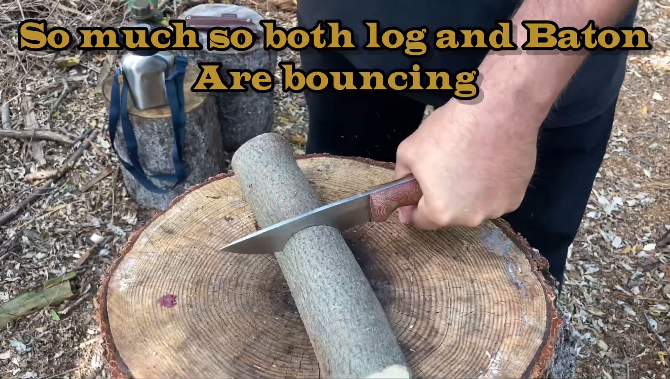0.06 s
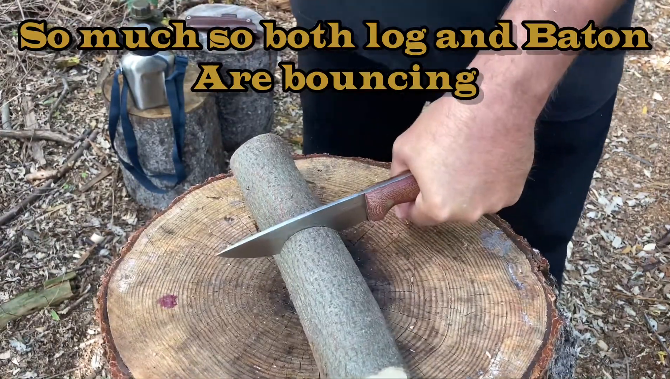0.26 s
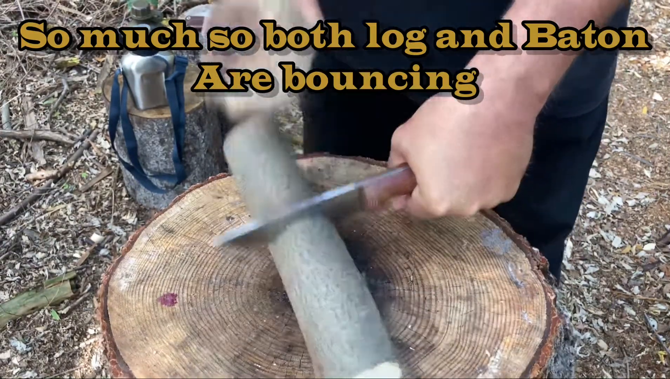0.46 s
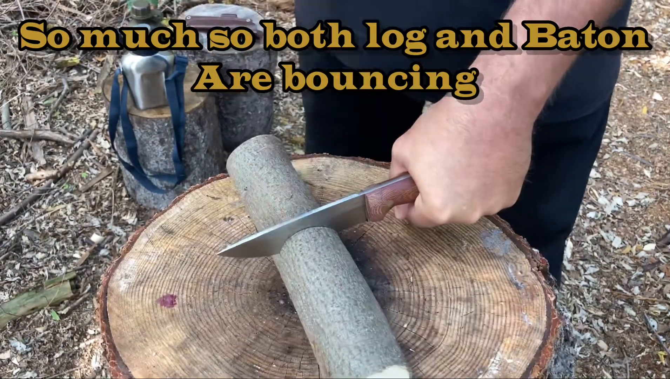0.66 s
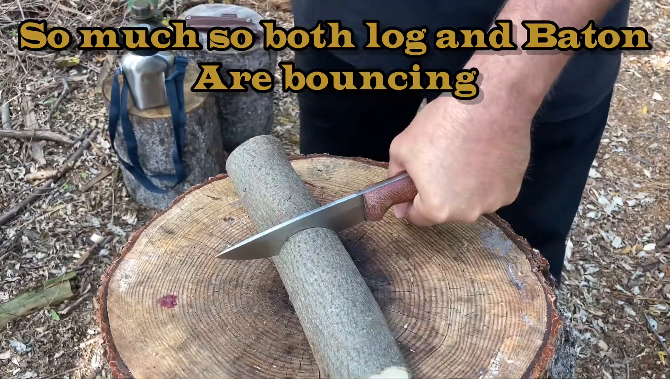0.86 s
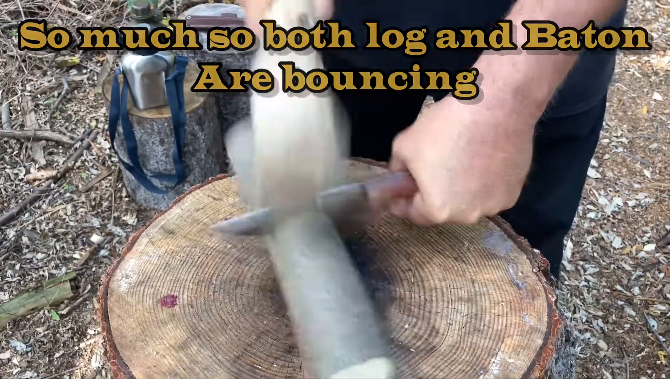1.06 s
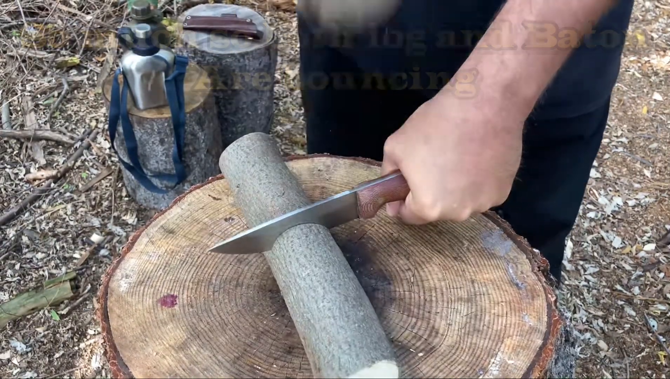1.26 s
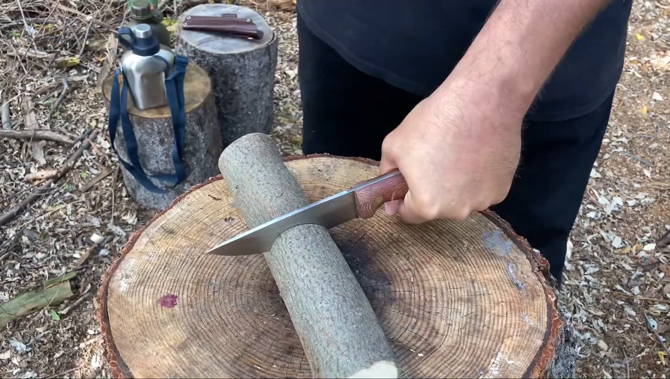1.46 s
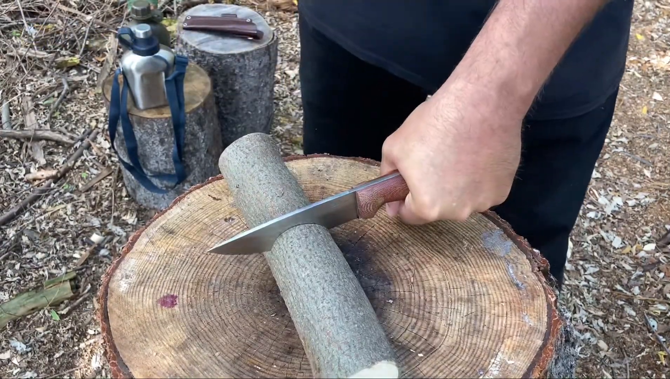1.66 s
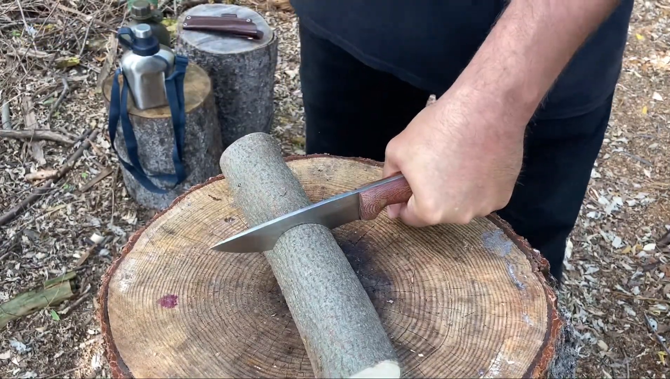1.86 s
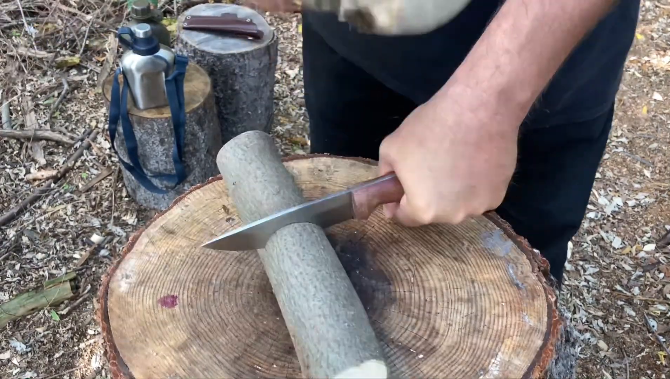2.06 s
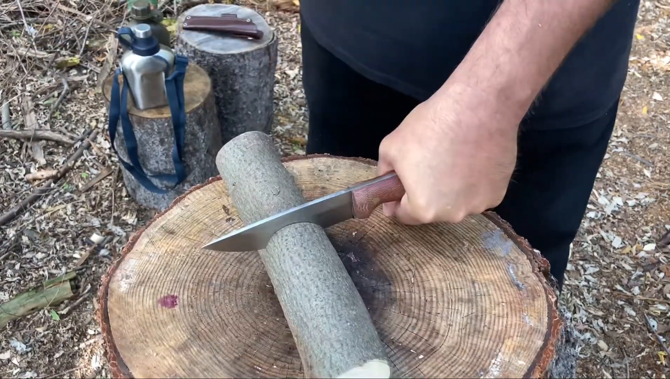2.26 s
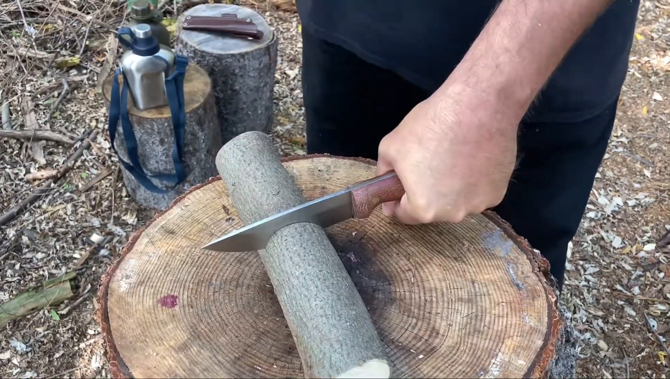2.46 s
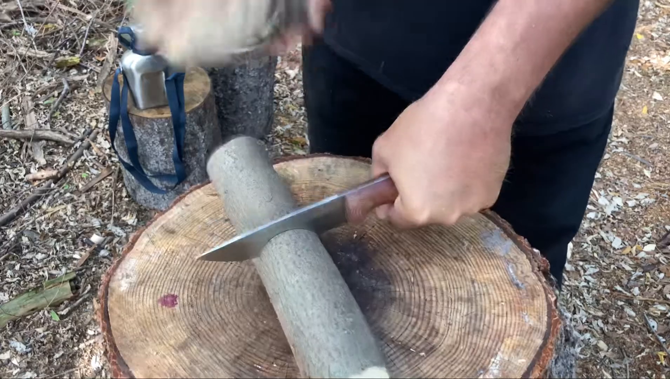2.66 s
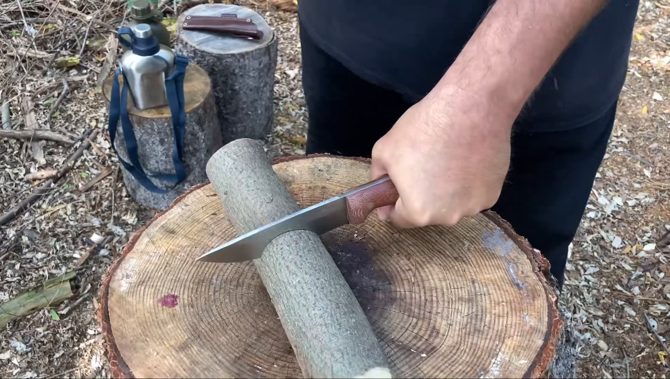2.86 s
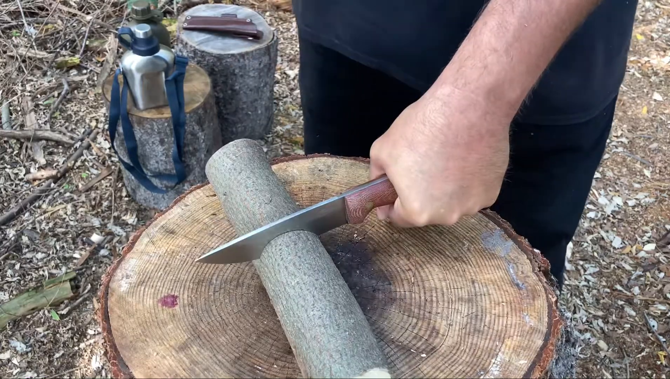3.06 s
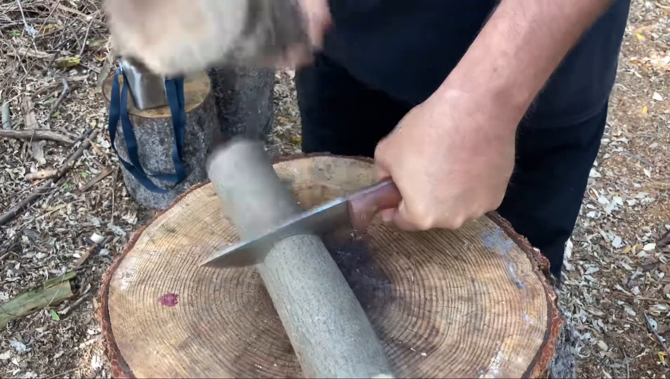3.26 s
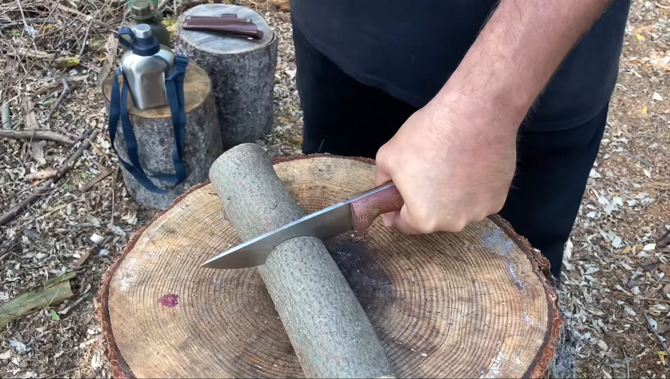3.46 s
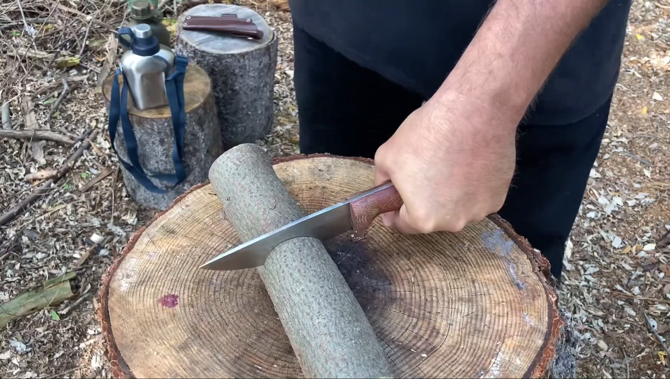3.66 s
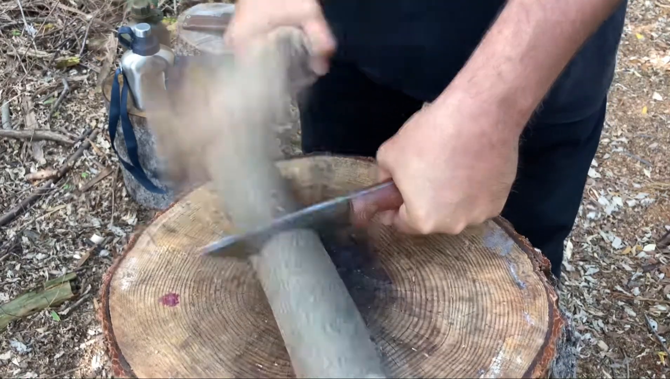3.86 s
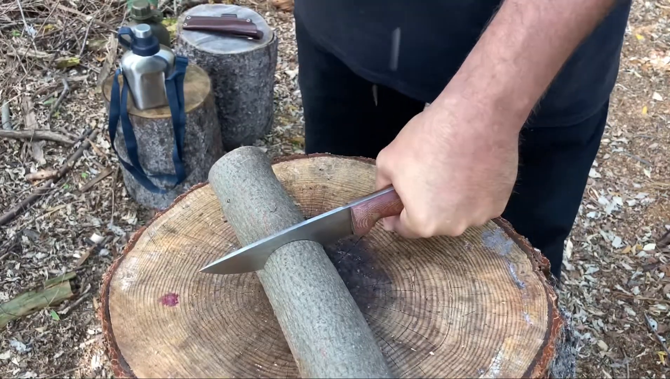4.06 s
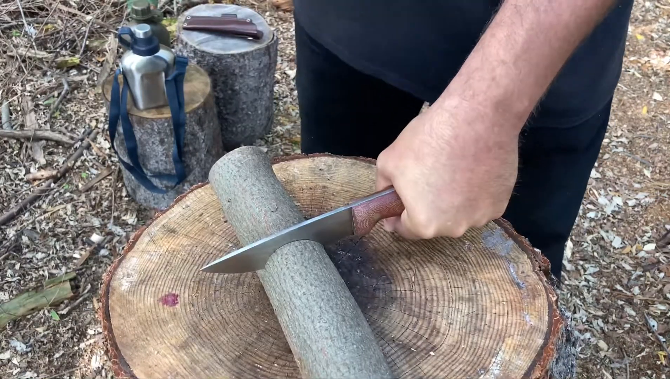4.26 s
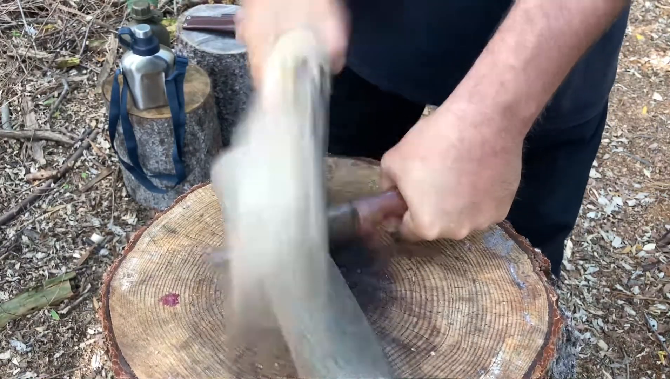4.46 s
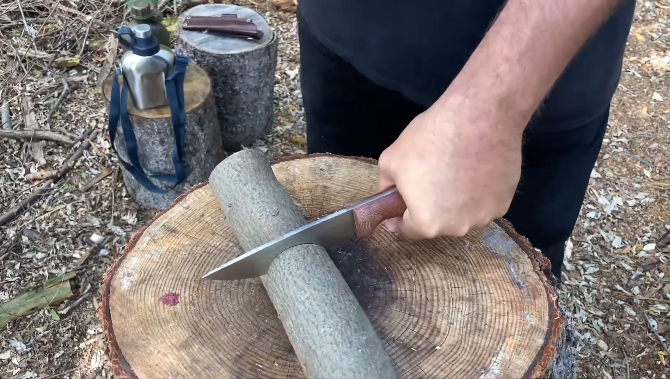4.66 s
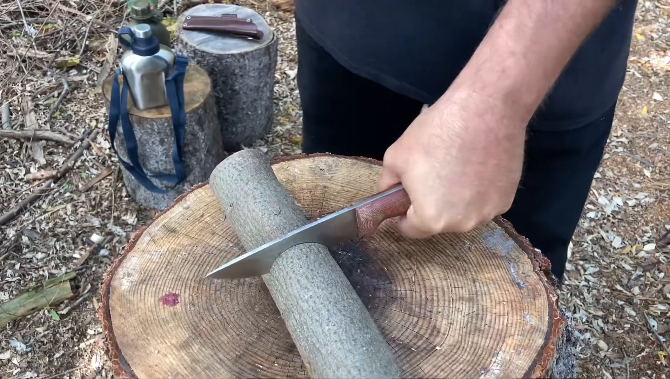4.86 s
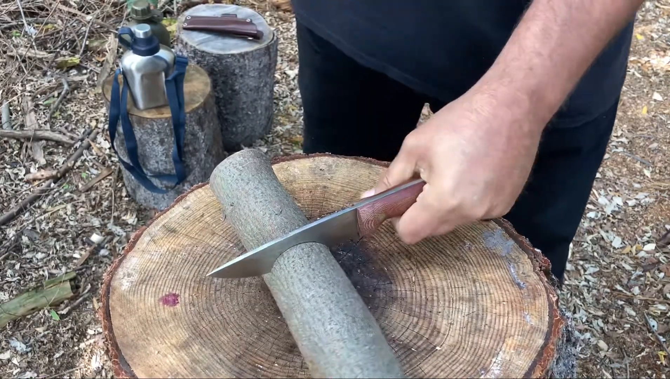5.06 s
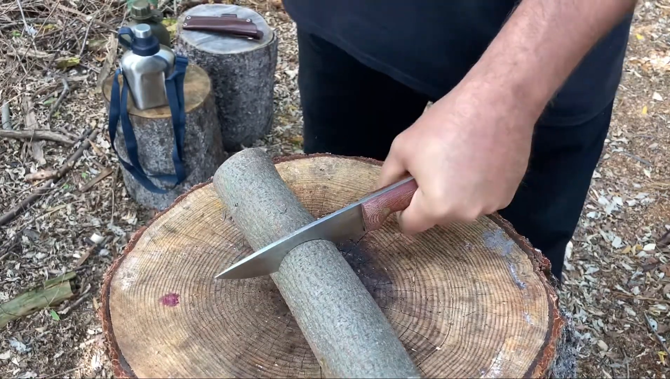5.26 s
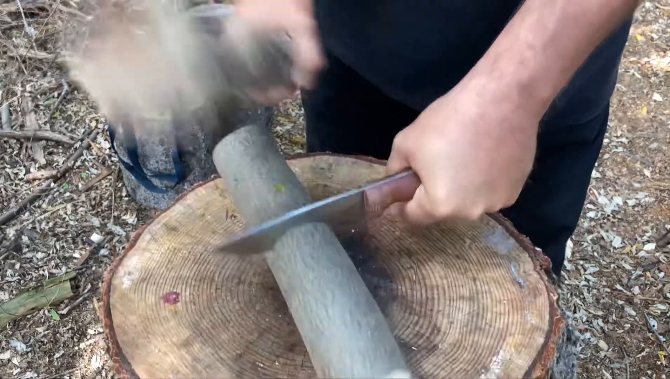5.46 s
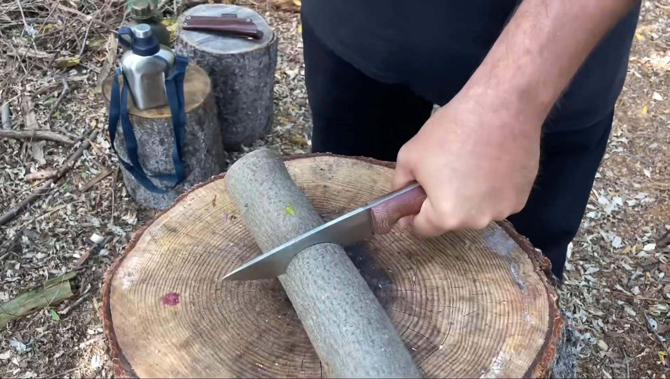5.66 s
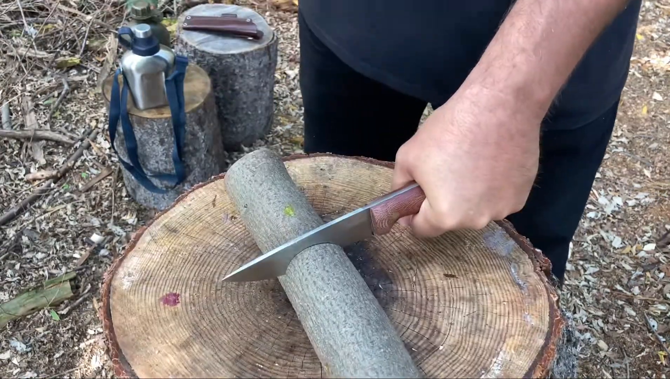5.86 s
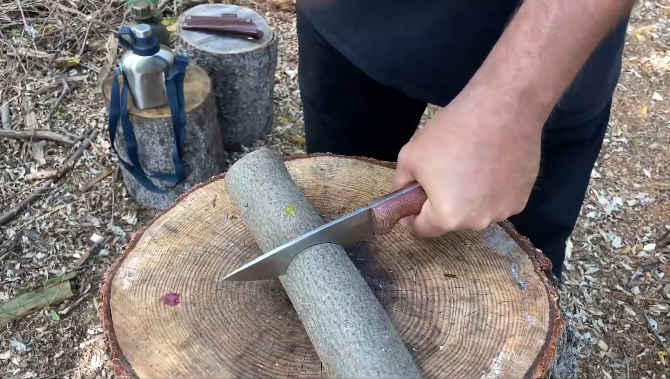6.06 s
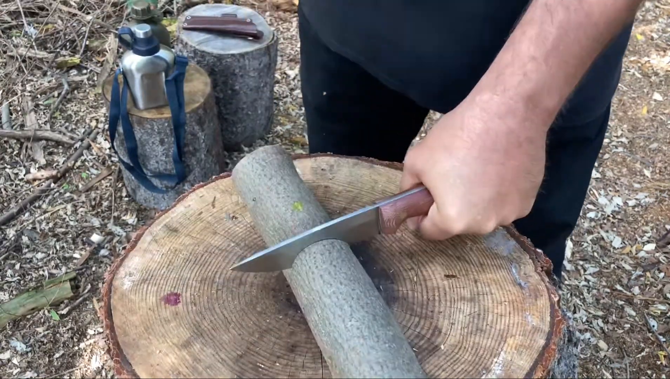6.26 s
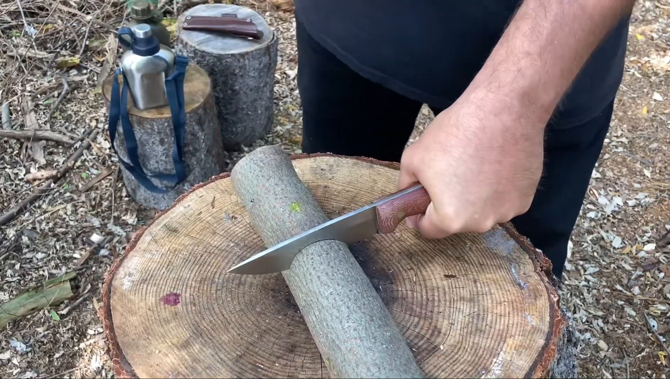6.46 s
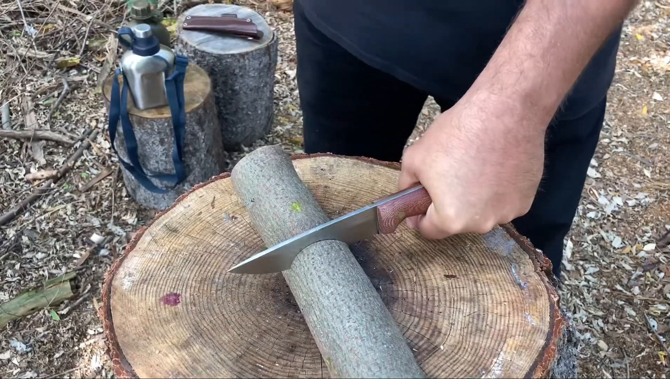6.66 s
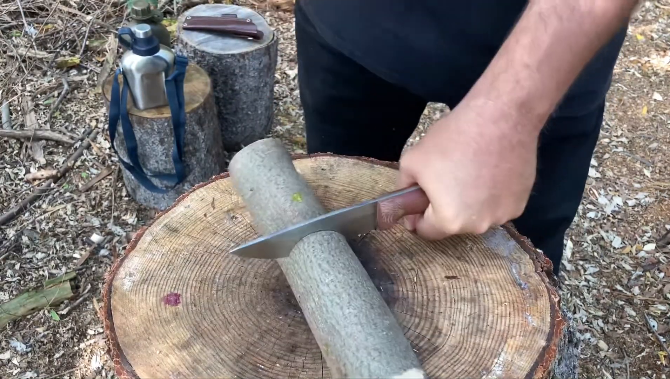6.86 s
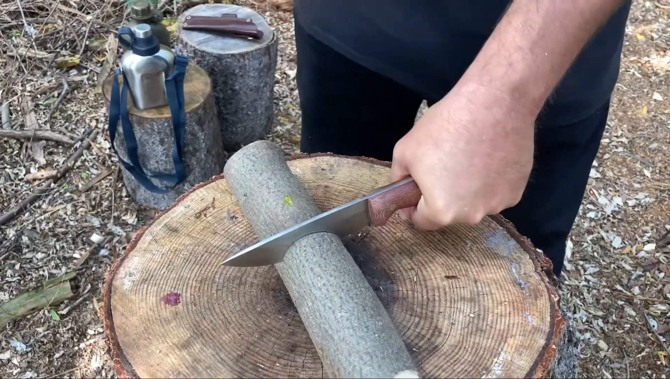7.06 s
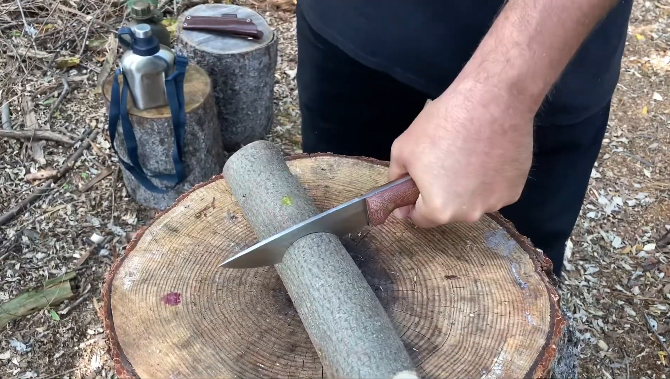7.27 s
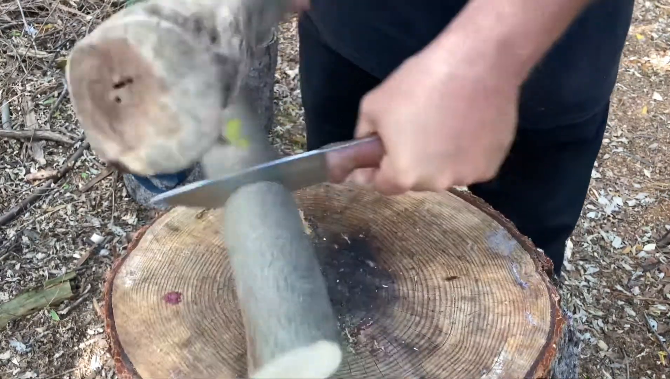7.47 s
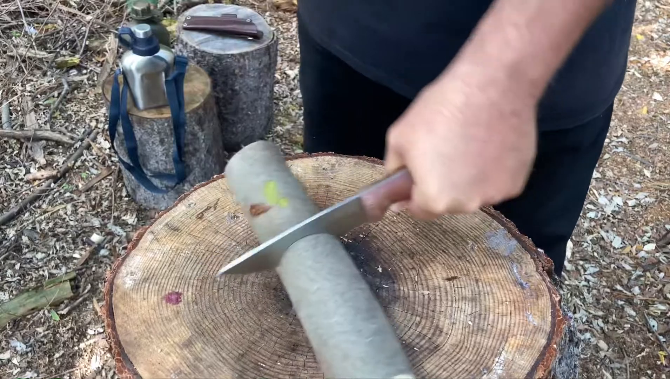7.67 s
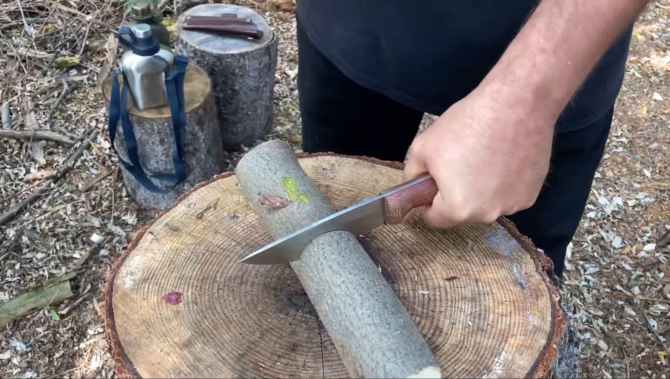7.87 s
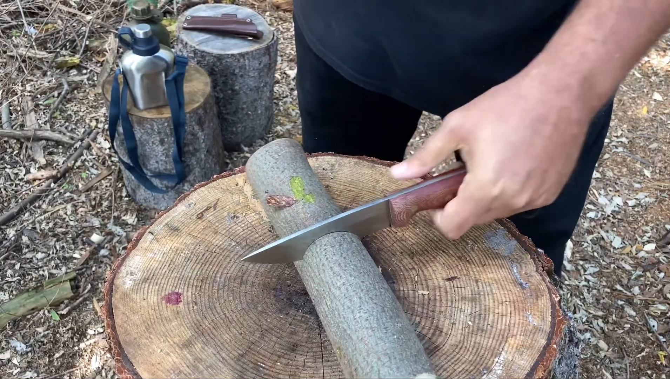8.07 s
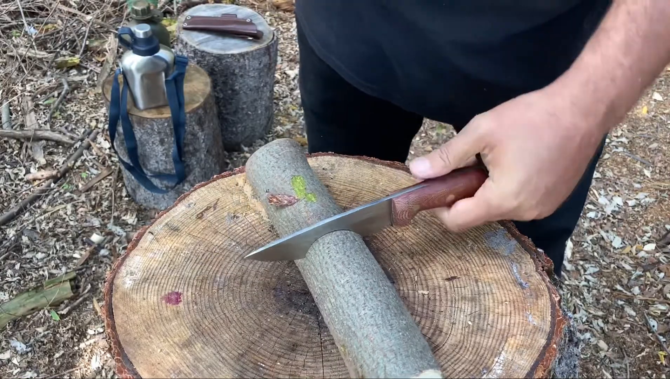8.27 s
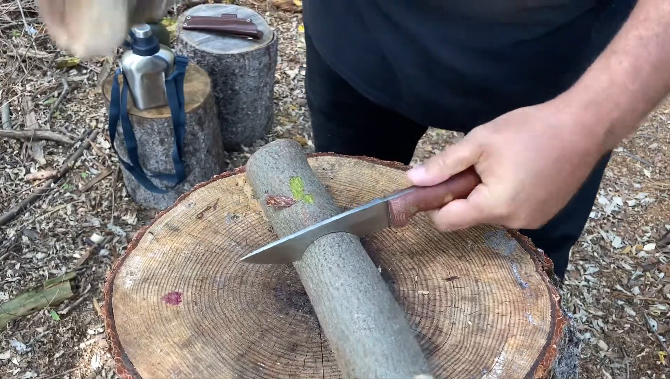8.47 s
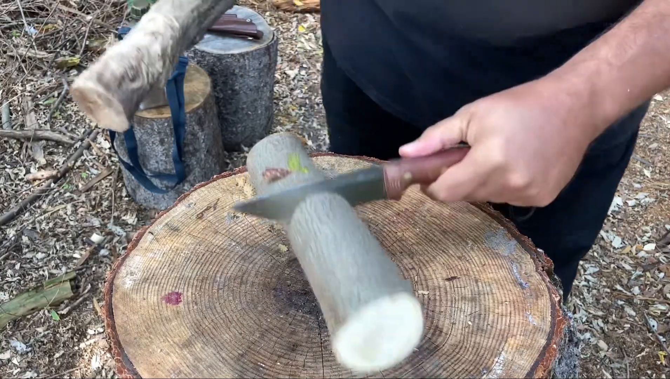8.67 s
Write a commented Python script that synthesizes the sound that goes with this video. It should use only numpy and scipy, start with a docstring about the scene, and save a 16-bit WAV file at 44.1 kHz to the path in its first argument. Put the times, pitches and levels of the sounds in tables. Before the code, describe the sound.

A wooden baton knocks a knife into a log eleven times at a steady pace, with sharp, close whacks in quiet woods.

```python
"""Batoning a log in a wood

A wooden baton drives a knife into a log on a stump. Each impact excites the damped modes of baton,
blade, log, stump and ground; the log bounces to rest and the trees scatter back a soft tail. The close
microphone overloads on the blows. At the end the log is set down and rocks once. Behind it all are
a low rumble, a soft hush, shrilling insects, faint bird whistles and two distant motors."""
import sys
import numpy as np
from scipy import signal
from scipy.fft import rfft, irfft, next_fast_len
from scipy.io import wavfile

SR = 44100
rng = np.random.default_rng(int(sys.argv[2]) if len(sys.argv) > 2 else 0)


def waveform_to_disk(signal):
    """Save audio, clipped to [-1, 1], as 16-bit WAV at the path in sys.argv[1]."""
    frames = np.transpose(np.atleast_2d(signal))
    scaled = np.clip(frames, -1, 1) * 32767
    samples = np.round(scaled).astype(np.int16)
    wavfile.write(sys.argv[1], SR, samples)


N = 384543
TIME = np.arange(N) / SR
BLOW_TIME = TIME[:SR * 3 // 4]

# Spectra of the outdoor air and the insect chorus: (frequency [Hz], relative density [dB])
AIR_SPECTRUM = [(20, -21), (40, -10), (62, 7), (90, -9), (160, -12), (280, -12.5), (400, -20.5), (900, -26),
                (1500, -33), (3000, -43.5), (5000, -45.5), (9000, -59.5), (11000, -53), (16000, -70)]
CHORUS_SPECTRUM = [(4800, -24.5), (5500, -17), (5950, -5), (6250, -4.5), (6530, -1.5), (6900, -7.5),
                   (7300, -5), (7800, -8.5), (8600, -26)]
# Envelopes of the hush, the far engine and a higher motor: (time [s], relative level [dB])
HUSH_ENVELOPE = [(0.0, -75.5), (0.51, -74.5), (1.29, -79.5), (4.44, -69.5), (4.76, -75), (7.62, -73),
                 (8.28, -77.5), (8.72, -70.5)]
ENGINE_ENVELOPE = [(0, -7.5), (1.7, -13), (2.8, 1), (4.2, -2.5), (5.2, -3), (5.8, -12), (6.501, -7),
                   (7.999, -2), (8.72, -1.5)]
WHINE_ENVELOPE = [(0, -13.5), (6.499, -12), (7.299, -0.5), (8.72, -1)]
# Line spectra of the two motors: (harmonic number [-], level before the envelope [dB])
ENGINE_HARMONICS = [(6, -61.5), (7, -73.5), (8, -65), (9, -69), (10, -77.5), (11, -75.5), (12, -69.5),
                    (18, -83.5)]
WHINE_HARMONICS = [(1, -80), (2, -91.5), (3, -91), (4, -94), (5, -98.5), (7, -98)]
# Bird whistles: (time [s], duration [s], start frequency [Hz], end frequency [Hz], peak level [dB])
BIRD_WHISTLES = [(1.254, 0.15, 2960, 2790, -82), (1.634, .14, 2940, 2765, -83),
                 (2.998, 0.37, 2137, 2277, -76), (8.454, .4, 2930, 2955, -81.5)]
# Single insects that stand out of the chorus: (frequency [Hz], level [dB])
INSECT_TONES = [(5990, -93), (6530, -91), (7280, -95)]
# Spectra of near and far scattering, contact snap and wood fibres: (frequency [Hz], relative density [dB])
NEAR_SPECTRUM = [(100, -7.5), (500, -3.5), (750, -1), (1150, -1), (1450, -7), (1750, -5), (2300, -8.5),
                 (3200, -13), (5000, -19), (7000, -26.5), (9000, -29), (11000, -27), (15000, -43)]
TREE_SPECTRUM = [(100, -4), (500, -8), (1300, -3), (1620, -2), (1730, 6.5), (1870, 0), (2800, -2.5),
                 (4000, -11.5), (6000, -21.5), (9000, -31.5), (15000, -39)]
CRACK_SPECTRUM = [(1000, -2.5), (2500, 6), (4000, 0.5), (5200, -4.5), (7200, 2), (8800, -15.5),
                  (11000, -1.5), (15500, -15)]
FIBRE_SPECTRUM = [(150, -0.5), (500, -2), (1000, 2.5), (2000, 5), (3000, -4.5), (5000, -23), (8000, -26),
                  (15000, -32)]
# Ticks and scuffs of bark and grip: (time [s], gain [dB], centre frequency [Hz], decay constant [s])
BARK_TICKS = [(.745, -70, 4200, .007), (5.05, -69.5, 3520, 0.034), (5.892, -60, 1854, 0.007),
              (5.965, -54, 7960, 0.0014), (6.8845, -63, 11000, 0.0015), (7.715, -65, 3000, 0.011),
              (8.625, -71, 4400, 0.026)]
# Modes of the struck bodies: (frequency [Hz], relative level [dB], time to fall 60 dB [s])
BATON_MODES = [(1165, -7.5, 0.0098), (1533, 3, 0.014), (1778.7, -1, 0.019), (1800, -7.5, 0.019),
               (2150, -6.5, 0.004)]
BLADE_MODES = [(2520, -10, .012), (2810, -14.5, 0.013), (2856, -11.5, 0.018), (4015, -18, 0.006),
               (4000, -29, 0.029), (7300, -23.5, 0.0075)]
LOG_MODES = [(630, -12, .018), (759, -10, 0.05), (1071, -20, 0.044), (1205, -25, .065),
             (1766.4, -27, 0.094)]
STUMP_MODES = [(332, -4, 0.029), (425, -3, 0.021)]
GROUND_MODES = [(93.3, -19.5, 0.065), (128, -16.5, .045)]
STUMP_THUD_MODES = [(313.4, -2.5, 0.03), (405, -0.5, 0.05), (597.8, -2, 0.016)]
LOG_CLACK_MODES = [(725, -1.5, 0.04), (1160, 1.5, 0.041), (1450, -5.5, .015), (1722, -12.5, 0.028),
                   (2560, -15.5, 0.015)]
# Blows on the knife's spine: (time [s], relative force [dB], nominal baton pitch [Hz], blade gain [dB],
# log gain [dB], stump gain [dB], relative crack level [dB], first hop duration [s], knock gain [dB])
BATON_BLOWS = [(0.3995, -4, 1601, 3, -3, -1.5, 3, .074, -45.5),
               (1.0376, -5.5, 1708, 1.5, -12, -5, -2, 0.069, -44),
               (1.9451, 0.9, 1615, 1.5, 0.63, -1, 4, 0.045, -29),
               (2.5763, 1.5, 1542, 2.5, 3.5, .5, -2, .074, -46),
               (3.1967, -0.5, 1598, 1, 1.5, -2, 1, .0545, -39),
               (3.824, 2.5, 1630, -1, -13.5, -3.5, 1.5, 0.041, -45),
               (4.445, -0.5, 1598, 3.5, 0.5, -3, 2.5, 0.032, -39),
               (5.4151, .5, 1631, 3, -3.5, -8.5, -12, .0575, -40.5),
               (6.079, 0.5, 1609, 2.5, 0.5, -3.5, 1, 0.049, -40.5),
               (6.726, 1.5, 1605, 1.5, -1, -3, -0.5, 0.038, -41),
               (7.3805, -5.5, 1572, 1, -4, -2.5, 4.5, 0.041, -61)]
# Response to force: (gain at 0 dB of force [dB], slope [dB/dB])
BATON_DRIVE, GROUND_DRIVE, LANDING_DRIVE = (1.3, .45), (-.7, 1.7), (3, 1.05)


def from_db(db):
    """Amplitude grows tenfold for every 20 dB."""
    return np.exp(np.asarray(db) * np.log(10) / 20)


def rms_one(x):
    """Normalisation to unit mean power."""
    return x / np.sqrt(np.mean(x ** 2) + 1e-20)


def in_time(rows):
    """Linear interpolation of an envelope at every sample."""
    return np.interp(TIME, *np.transpose(rows))


def add(track, s, sound):
    """Superposition: a sound adds to the track from time s on."""
    start = round(s * SR)
    track[start:start + len(sound)] += sound[:N - start]


def cut(x, hz, kind, order=2):
    """Butterworth low- or high-pass filtering, maximally flat in the passband."""
    return signal.sosfilt(signal.butter(order, min(hz, SR / 2 - 100), kind, fs=SR, output="sos"), x + 1e-18)


def noise(spectrum, size=N):
    """Spectral shaping of white noise, at rms 1."""
    hz, db = np.transpose(spectrum)
    padded = next_fast_len(size)
    bins = np.maximum(np.fft.rfftfreq(padded, 1 / SR), 1)
    gain = from_db(np.interp(np.log(bins), np.log(hz), db))
    return rms_one(irfft(rfft(rng.standard_normal(padded)) * gain, padded)[:size])


def drift(per_s):
    """Random modulation: straight lines join Gaussian values of unit variance."""
    knots = rng.standard_normal(6000)
    return np.interp(TIME * per_s, np.arange(len(knots)), knots)


def burst(spectrum, rise_s, decay_s):
    """A noise transient with exponential rise and decay."""
    carrier = noise(spectrum, size=len(BLOW_TIME))
    return carrier * (1 - np.exp(-BLOW_TIME / rise_s)) * np.exp(-BLOW_TIME / decay_s)


def ring(modes, delay_s=0., stretch=1, uneven_db=2.5, detune=0.0029):
    """Free vibration in damped modes; strength and pitch vary at random, as with the point of contact."""
    t, out = np.maximum(BLOW_TIME - delay_s, 0), 0
    for k, (hz, db, t60) in enumerate(modes):
        strength, shift = rng.standard_normal(2)
        pitch = hz * stretch * (1 + detune * shift)
        envelope = from_db(db + uneven_db * strength - 60 * t / t60)
        out = out + (-1) ** k * envelope * np.sin(2 * np.pi * pitch * t)
    return out


def spread(make, side_db):
    """Decorrelation: independent middle and side signals make a sound diffuse."""
    return make() + from_db(side_db) * make() * np.array([[1], [-1]])


def rumble():
    """Low-passed outdoor noise swells and sinks by random amplitude modulation."""
    return from_db(-58.5 + 3 * drift(4.5)) * rms_one(cut(noise(AIR_SPECTRUM), 170, "low"))


def hush():
    """The hush of the wood is high-passed noise under a slow envelope."""
    level_db = in_time(HUSH_ENVELOPE) + 2.07 + .5 * drift(5.8)
    return from_db(level_db) * rms_one(cut(noise(AIR_SPECTRUM), 360, "high"))


def motor(hz, harmonics, envelope, waver, flutter_db):
    """Periodic motion radiates harmonics of its rotation rate, which wavers slightly."""
    turns = np.cumsum(hz * (1 + waver * drift(2.4))) / SR
    tones = 0
    for k, db in harmonics:
        tones += from_db(db + flutter_db * drift(1.7)) * np.sin(2 * np.pi * (k * turns + rng.random()))
    return from_db(in_time(envelope)) * np.sqrt(2) * tones


def engines():
    """Two harmonic series: a far engine drones, and a higher motor's whine grows near the end."""
    drone = motor(hz=24.02, harmonics=ENGINE_HARMONICS, envelope=ENGINE_ENVELOPE, waver=.0023, flutter_db=2)
    whine = motor(hz=418, harmonics=WHINE_HARMONICS, envelope=WHINE_ENVELOPE, waver=.00067, flutter_db=3.5)
    return drone + whine


def birds():
    """Far whistles are pure tones in linear glide; phase is the integral of frequency."""
    out = np.zeros(N)
    for s, length_s, start_hz, end_hz, db in BIRD_WHISTLES:
        hz = np.linspace(start_hz, end_hz, round(length_s * SR))
        add(out, s, from_db(db) * np.hanning(len(hz)) * np.sin(2 * np.pi * np.cumsum(hz) / SR))
    return out


def shrill(hz, width_hz):
    """Random amplitude and phase broaden a tone into a rough, narrow band, at rms 1."""
    wobble = drift(width_hz) + 1j * drift(width_hz)
    return rms_one(np.real(wobble * np.exp(2j * np.pi * hz * TIME)))


def insects(chirps_per_s=10.7):
    """Pulse modulation of a narrow band makes one cricket's chirps, over a steady chorus."""
    beat = np.cumsum(chirps_per_s * (1 + 0.054 * drift(3.2))) / SR
    chirps = np.maximum(np.sin(2 * np.pi * beat) + 0.62, 0)
    cricket = from_db(-85.5 + 1.5 * drift(4.5)) * rms_one(chirps * shrill(5735, width_hz=200))
    singles = sum(from_db(db) * shrill(hz, width_hz=37) for hz, db in INSECT_TONES)
    chorus = from_db(-83 + 0.86 * drift(27)) * noise(CHORUS_SPECTRUM)
    return cricket + singles + chorus


def woodland():
    """Scattering: ground and stumps return each blow at once, the trees later and more softly."""
    out = np.zeros(N)
    for s, *_ in BATON_BLOWS:
        near = from_db(-32) * burst(NEAR_SPECTRUM, rise_s=.0013, decay_s=.019)
        far = from_db(-55.5) * burst(TREE_SPECTRUM, rise_s=.04, decay_s=.09)
        add(out, s, near + far)
    return out


def ticks():
    """Tiny snaps and scuffs of bark and grip are band-limited noise transients."""
    out = np.zeros(N)
    for s, db, hz, decay_s in BARK_TICKS:
        band = [(hz / 4, -26), (hz / 1.3, -10), (hz, 0), (hz * 2, -20)]
        add(out, s, from_db(db) * burst(band, rise_s=decay_s / 4, decay_s=decay_s))
    return out


def knock(thud_db):
    """A light impact excites both bodies: the stump thuds, the loose log clacks, its bark crunches."""
    thud = ring(STUMP_THUD_MODES, delay_s=0.0009, detune=0.034)
    clack = ring(LOG_CLACK_MODES, uneven_db=0.5, detune=0.034)
    crunch = burst(FIBRE_SPECTRUM, rise_s=0.00024, decay_s=0.003)
    return from_db(thud_db) * thud + clack + from_db(-3) * crunch


def set_down(s=7.657, db=-38.5, rock_s=.057, rock_loss_db=29):
    """Damped rocking: the log, with the knife stuck in it, meets the stump and knocks once more."""
    out = np.zeros(N)
    add(out, s, from_db(db) * knock(thud_db=8))
    add(out, s + rock_s, from_db(db - rock_loss_db) * knock(thud_db=8))
    return out


def bounces(count=2, restitution=0.74, knock_loss_db=16):
    """Inelastic rebound: after each blow the log's loose end hops, each time shorter and softer."""
    out = np.zeros(N)
    for s, *_, hop_s, knock_db in BATON_BLOWS:
        for k, after_s in enumerate(np.cumsum(hop_s * restitution ** np.arange(count))):
            add(out, s + after_s, from_db(knock_db - k * knock_loss_db) * knock(thud_db=-2.5))
    return out


def landing():
    """Soft impacts excite low modes: the log's weight lands twice, hundredths of a second after a blow."""
    first = ring(STUMP_MODES, delay_s=.0345 + 0.001 * rng.normal(), stretch=.88, uneven_db=4.5)
    second = ring(STUMP_MODES, delay_s=0.049 + 0.00035 * rng.normal(), stretch=.75, uneven_db=4.5)
    ground = ring(GROUND_MODES, delay_s=0.048, stretch=1.2)
    return cut(from_db(-26.5) * first + from_db(-32) * second + from_db(-15.5) * ground, 700, "low")


def cracks():
    """A brief contact has a broad spectrum: the sharp snap of each blow."""
    out = np.zeros(N)
    for s, *_, crack_db, _hop_s, _knock_db in BATON_BLOWS:
        add(out, s, from_db(crack_db - 4.5) * burst(CRACK_SPECTRUM, rise_s=0.0017, decay_s=.0012))
    return out


def driven(drive, force_db):
    """A power law relates a body's amplitude to the force of the blow."""
    usual_db, slope = drive
    return from_db(usual_db + slope * force_db)


def blows():
    """Impulse transmission: baton and blade ring first, then log, stump and ground in turn."""
    out = np.zeros(N)
    usual_hz = np.median([row[2] for row in BATON_BLOWS])
    for s, force_db, hz, blade_db, log_db, stump_db, *_ in BATON_BLOWS:
        baton = ring(BATON_MODES, stretch=hz / usual_hz, uneven_db=1.13, detune=0.0041)
        sound = driven(BATON_DRIVE, force_db) * baton
        sound += from_db(blade_db) * ring(BLADE_MODES, detune=0.014)
        # wood fibres crunch as the edge bites
        sound += from_db(blade_db - 13.5) * burst(FIBRE_SPECTRUM, rise_s=0.00019, decay_s=0.0046)
        sound += from_db(log_db) * ring(LOG_MODES, delay_s=.0008, uneven_db=.9, detune=.004)
        sound += from_db(stump_db) * ring(STUMP_MODES, delay_s=0.001, uneven_db=1.0)
        sound += driven(GROUND_DRIVE, force_db) * ring(GROUND_MODES, delay_s=0.0032)
        sound += driven(LANDING_DRIVE, force_db) * landing()
        add(out, s, sound)
    return out


def close_by(x, lag_s=8e-6):
    """Group delay: sound reaches the right port later, most in the upper midrange; the bass leans right."""
    b, a = signal.iirpeak(2550, Q=2.8, fs=SR)
    turned = signal.lfilter(a[::-1], a, x + 1e-18)   # all-pass: phase turns, level stays
    late = np.interp(TIME - lag_s, TIME, turned)
    left = from_db(.9) * x - from_db(-14) * cut(x, 600, "low", order=1)
    right = from_db(-.7) * late + from_db(-15) * cut(late, 600, "low", order=1)
    return np.array([left, right])


def scene():
    """Superposition of the direct sound, its tail among the trees and the background."""
    direct = close_by(blows() + bounces() + set_down() + ticks()) + spread(cracks, side_db=-0.5)
    air = spread(rumble, side_db=-9.5) + spread(hush, side_db=4)
    tail = spread(woodland, side_db=0)
    return direct + tail + air + spread(insects, side_db=-2.5) + engines() + birds()


def record(dry, cutoff_hz=16200):
    """Overload clips the peaks flat at full scale; a steep low-pass then limits the bandwidth."""
    low_pass = signal.ellip(10, .1, 80, cutoff_hz, fs=SR, output="sos")
    return signal.sosfilt(low_pass, np.clip(dry, -1, 1))


dry = scene()
out = record(dry)
waveform_to_disk(out)
```